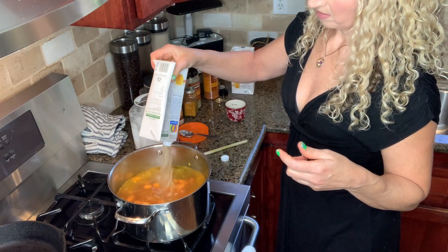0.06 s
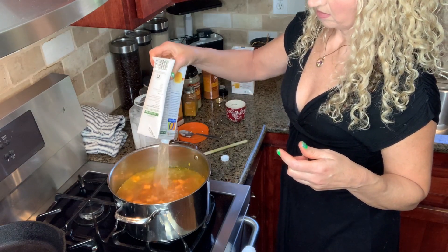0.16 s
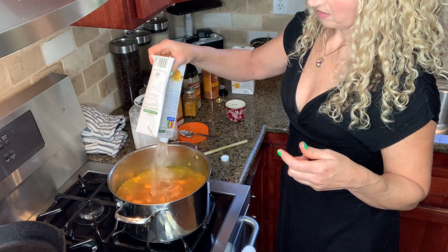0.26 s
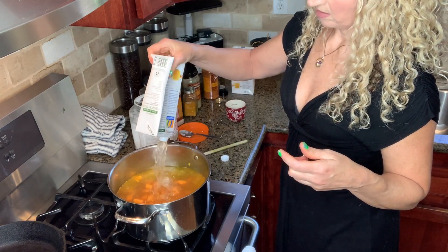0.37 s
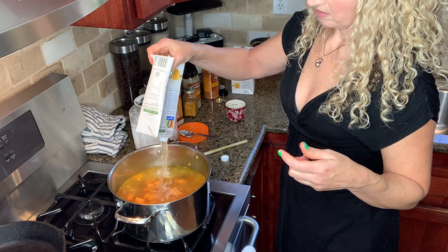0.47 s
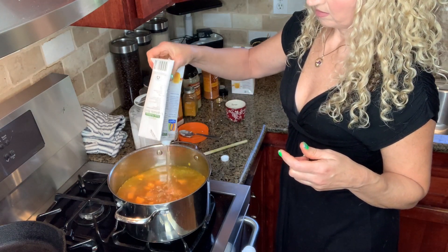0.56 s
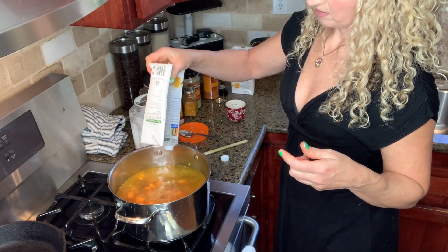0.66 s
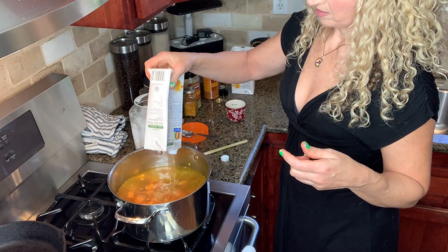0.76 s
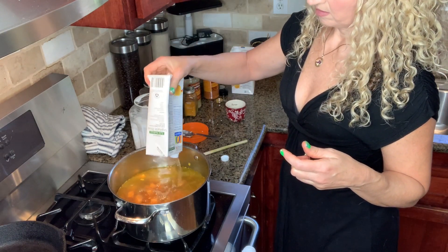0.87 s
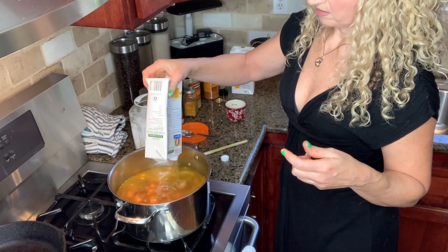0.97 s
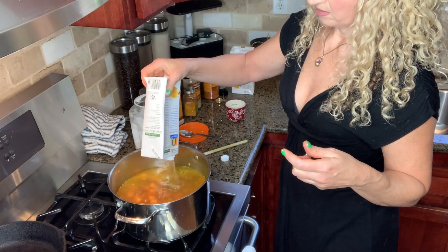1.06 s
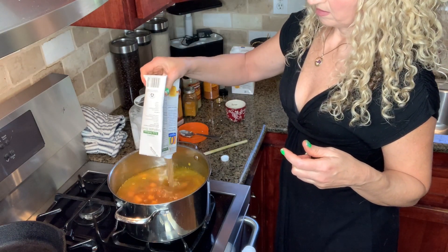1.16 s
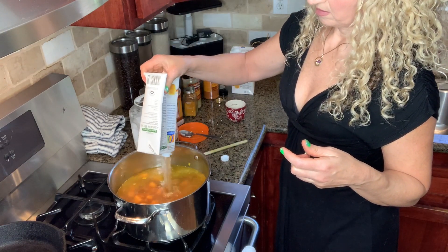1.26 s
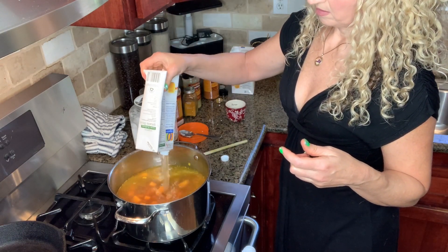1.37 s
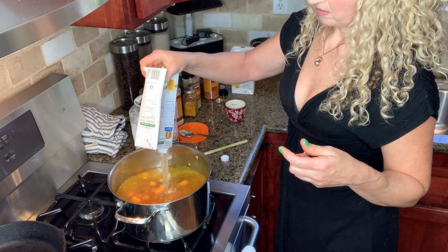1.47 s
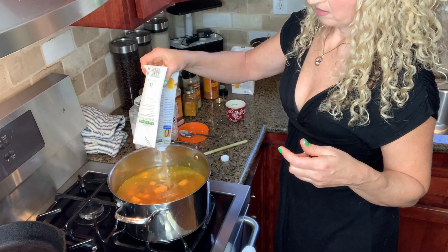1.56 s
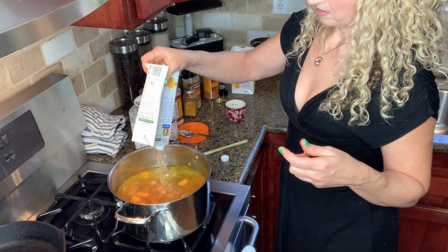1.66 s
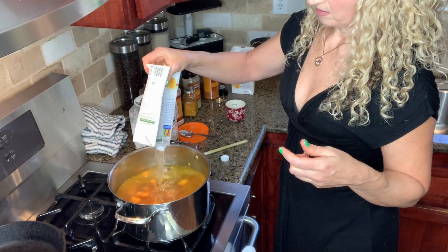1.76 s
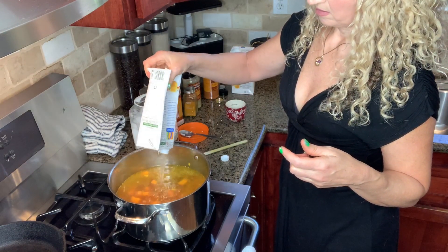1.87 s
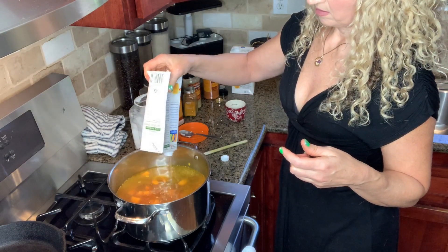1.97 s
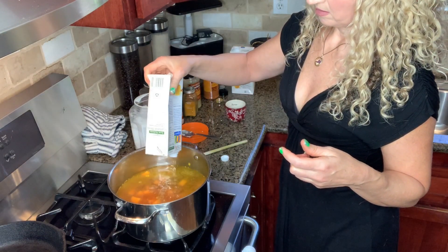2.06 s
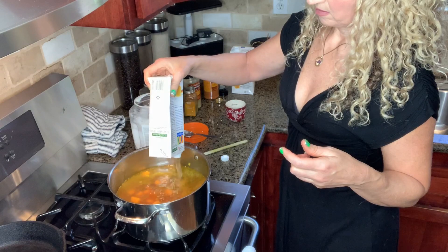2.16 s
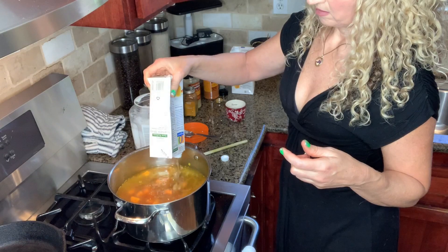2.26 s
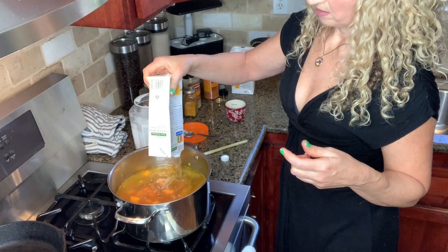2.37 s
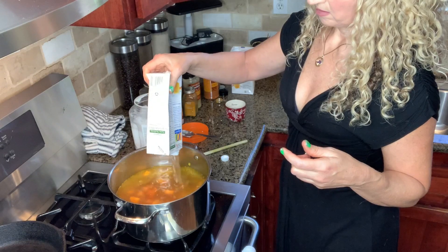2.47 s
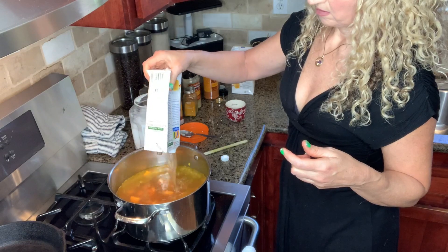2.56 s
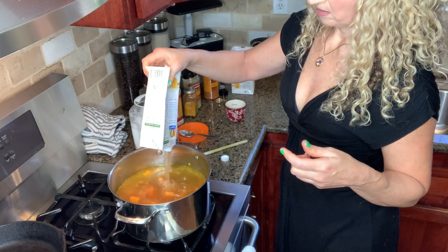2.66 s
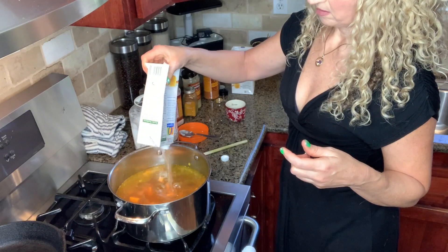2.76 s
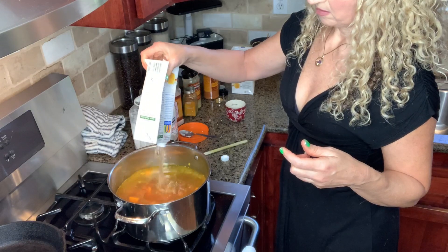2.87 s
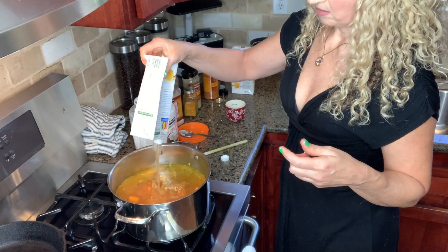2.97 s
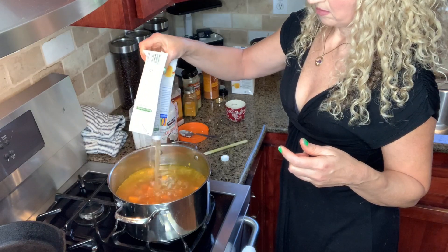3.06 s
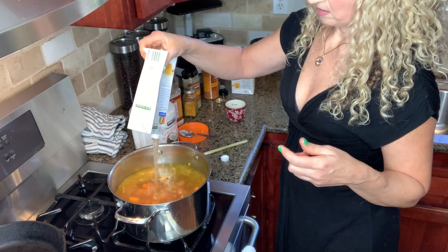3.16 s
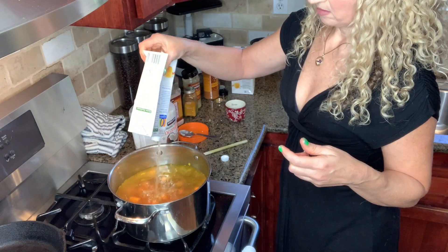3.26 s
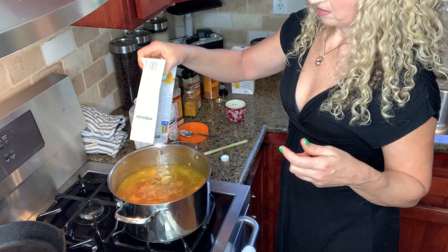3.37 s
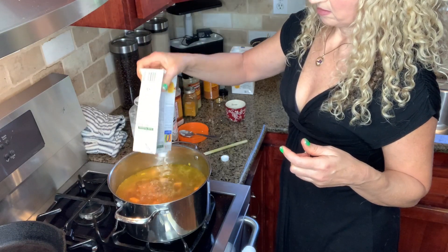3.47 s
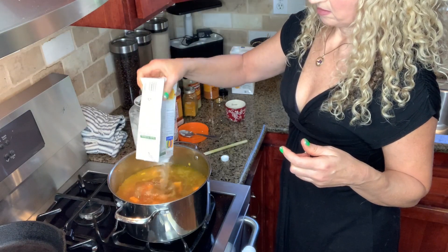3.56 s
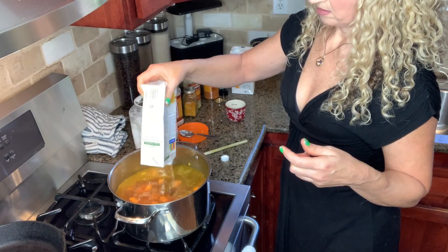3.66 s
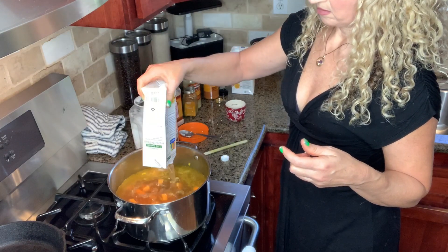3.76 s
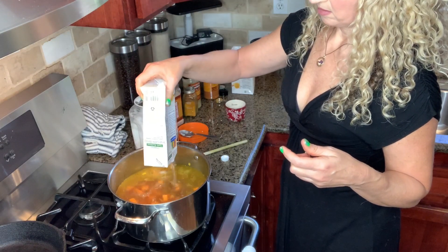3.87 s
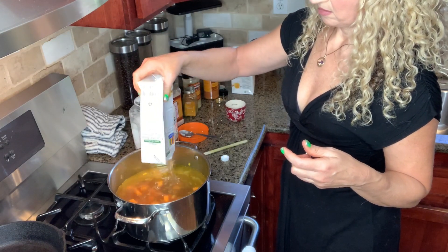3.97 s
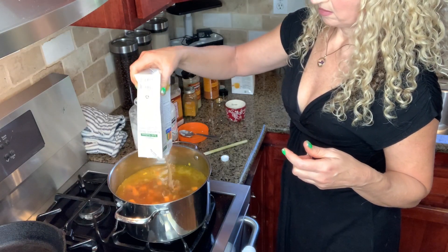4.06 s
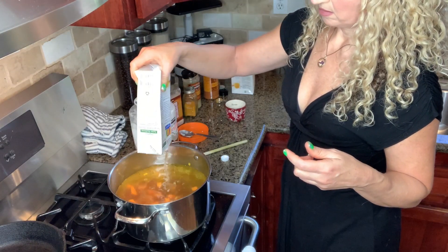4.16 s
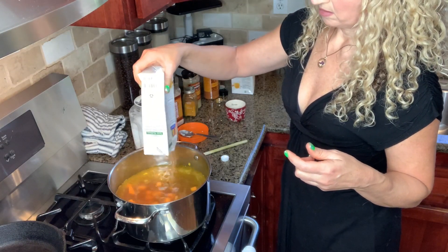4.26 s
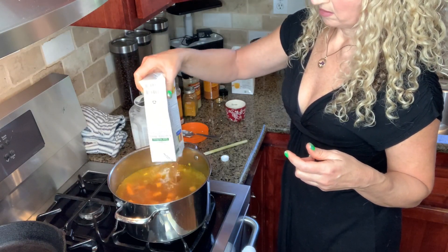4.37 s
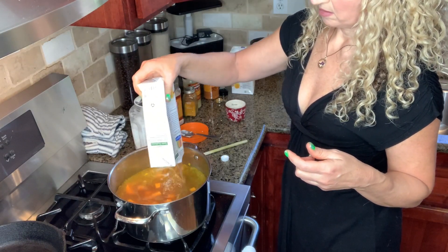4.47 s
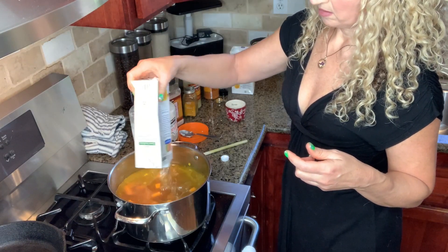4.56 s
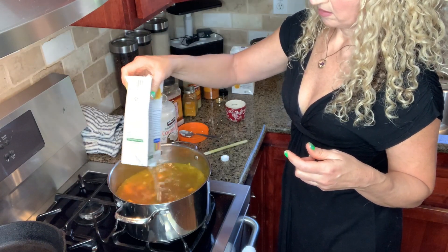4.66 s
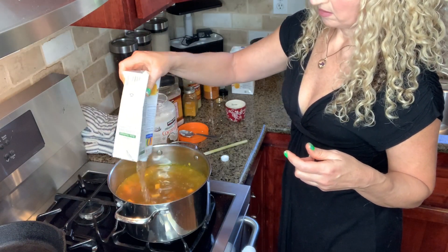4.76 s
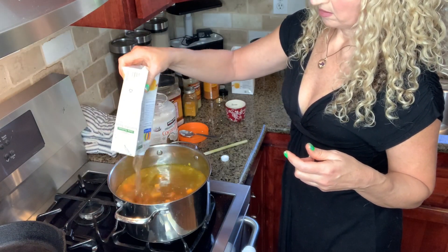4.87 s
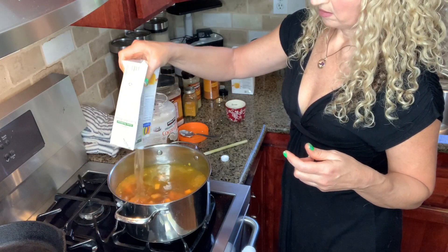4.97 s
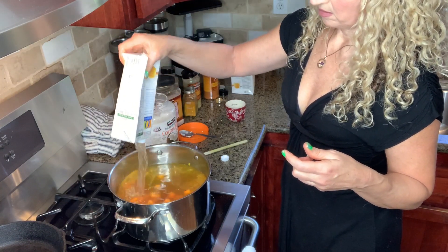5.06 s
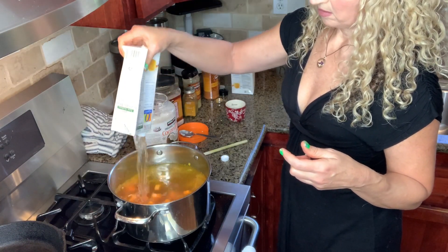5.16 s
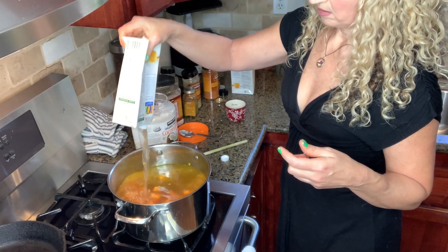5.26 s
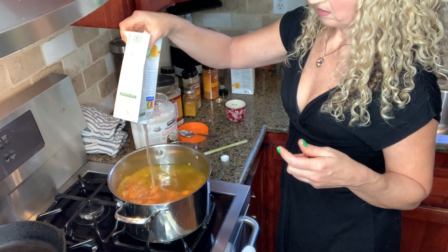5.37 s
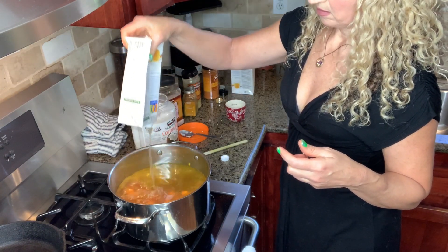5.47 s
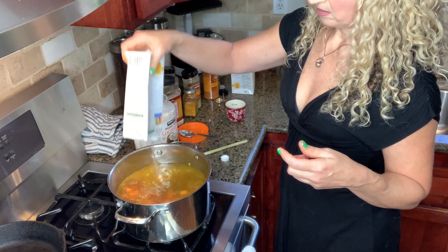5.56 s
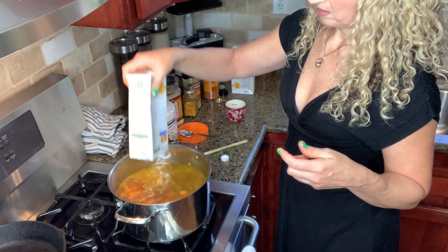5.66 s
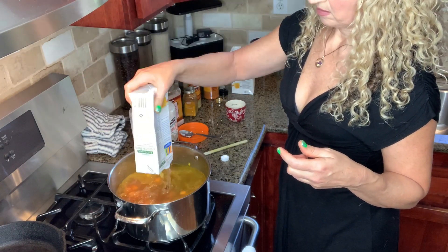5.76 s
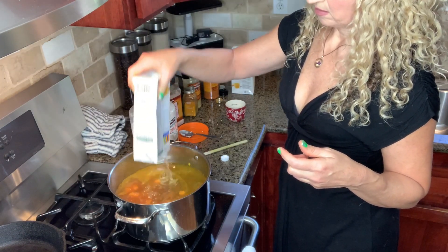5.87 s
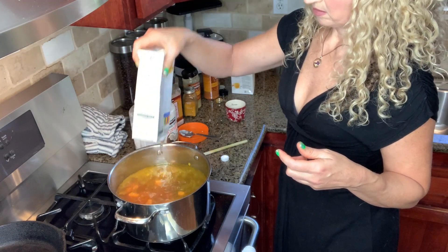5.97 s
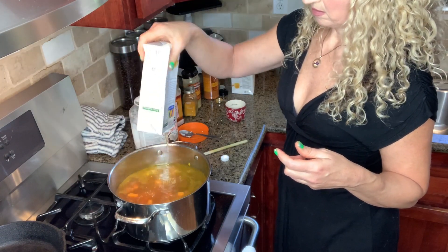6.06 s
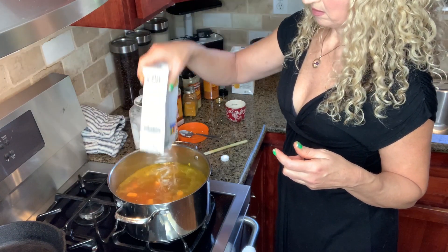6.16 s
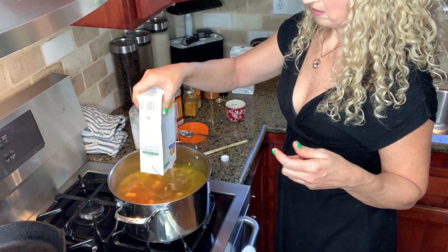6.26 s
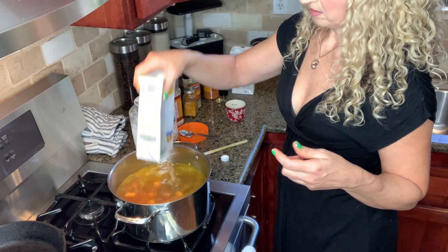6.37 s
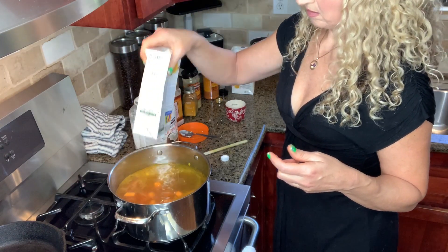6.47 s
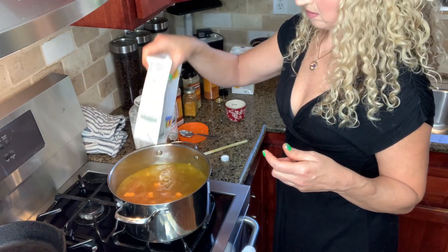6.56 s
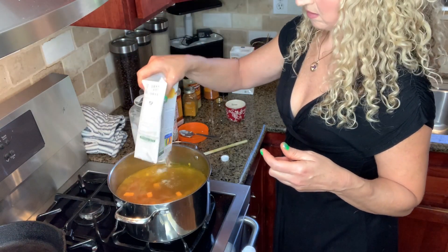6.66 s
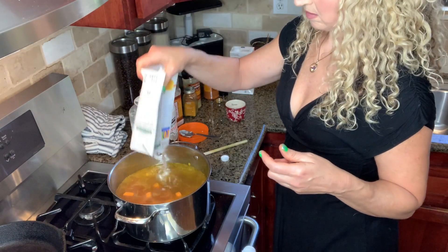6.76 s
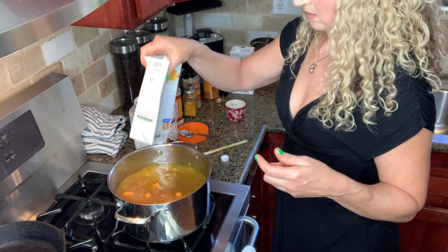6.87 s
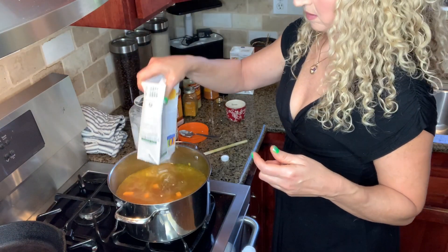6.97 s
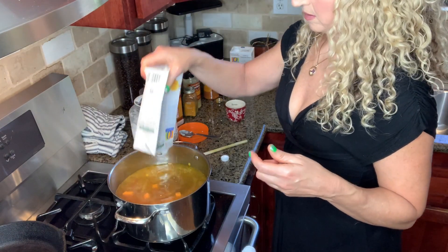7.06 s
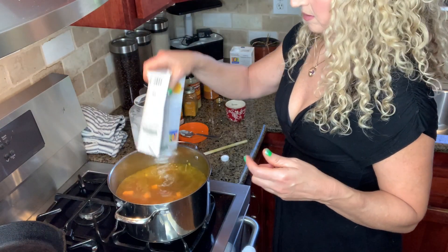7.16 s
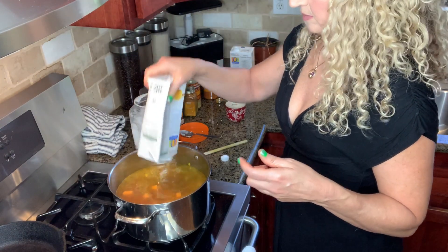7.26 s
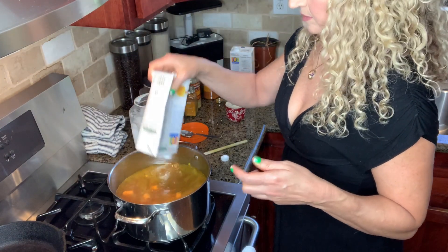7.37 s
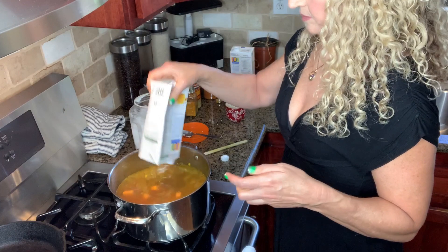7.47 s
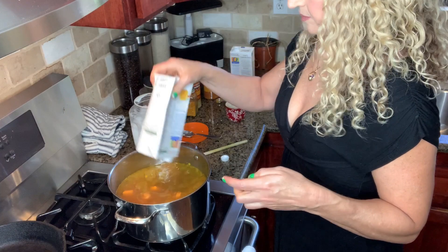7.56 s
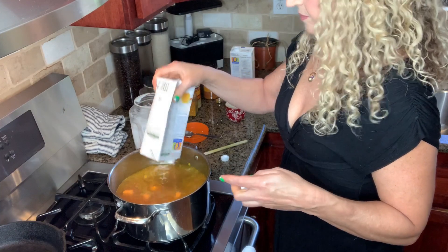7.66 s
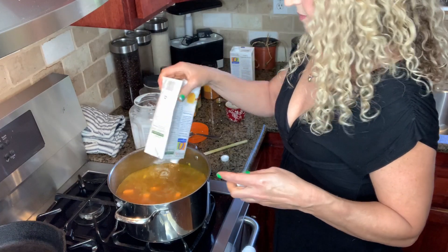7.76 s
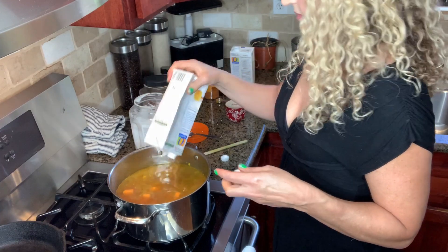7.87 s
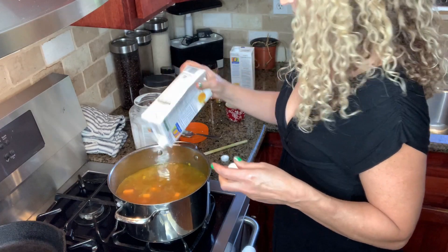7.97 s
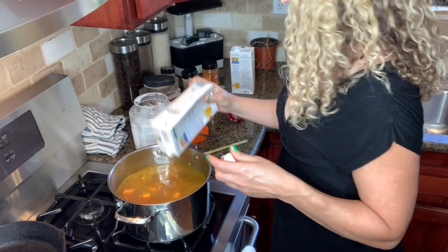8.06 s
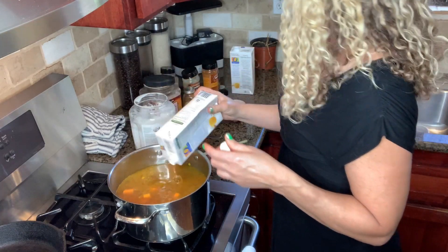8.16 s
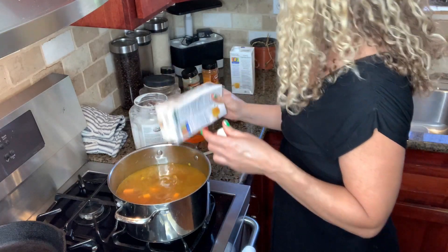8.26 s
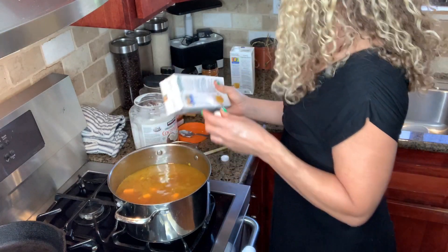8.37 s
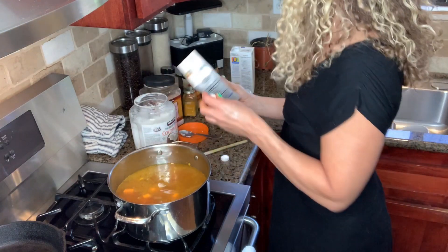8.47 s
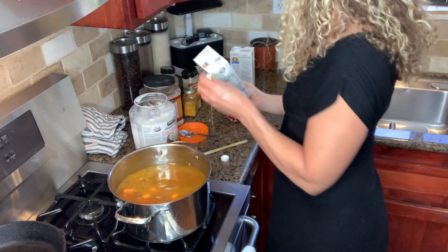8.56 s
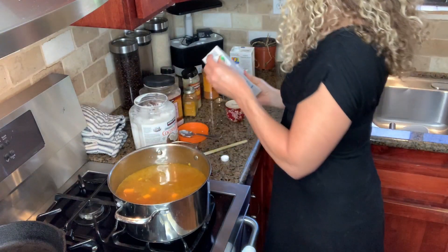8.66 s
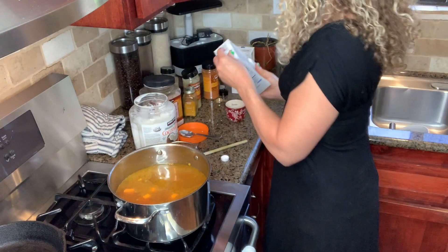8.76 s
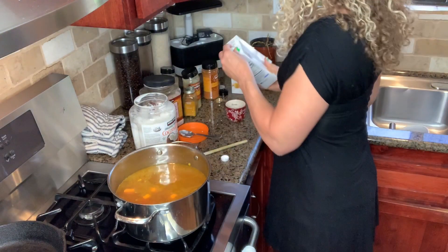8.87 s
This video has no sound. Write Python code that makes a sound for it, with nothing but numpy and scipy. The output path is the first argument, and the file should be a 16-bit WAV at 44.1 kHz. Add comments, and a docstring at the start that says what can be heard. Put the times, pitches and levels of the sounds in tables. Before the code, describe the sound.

A broken stream of liquid gurgles and spatters into a pot in a small kitchen, dwindles away, followed by a sharp knock and faint closing hiss.

```python
"""Pouring broth into a pot

Broth pours from a carton into a steel pot of soup: a broken stream of plops, bubbles and spray, thinning to
drips. Splashes are bubble tones plus noise, colored by the pot's resonances; gulped air thumps the carton.
Then one hard knock rings the counter, and a broad hiss swells at the close. A small hard kitchen echoes under
a low appliance drone; two close microphone ports hear the treble out of step."""
import sys
import numpy as np
from scipy import signal
from scipy.fft import rfft, irfft, next_fast_len
from scipy.io import wavfile
from scipy.ndimage import map_coordinates

SR = 44100
rng = np.random.default_rng(int(sys.argv[2]) if len(sys.argv) > 2 else 0)


def store_pcm(level_fs):
    """Save levels as 16-bit WAV."""
    pcm = np.round(np.clip(level_fs, -1, 1) * 32767).astype(np.int16)
    wavfile.write(sys.argv[1], SR, np.atleast_2d(pcm).T)


N = 393813   # length in samples

# How the stream surges and slackens as the carton is tipped and shaken: start_s, flow_db (level of the spray)
STREAM_FLOW = [(0.0, -46), (0.2, -46.5), (0.77, -62.5), (1.15, -63.5), (1.35, -55.5), (2.0, -55),
               (2.5, -58), (2.76, -49), (2.99, -47), (3.2, -54.5), (3.8, -63), (4.05, -67.5), (4.55, -66.5),
               (4.95, -48), (5.73, -60), (6.08, -78.5), (6.33, -55.5), (6.46, -86.5), (6.72, -89),
               (6.93, -69.5), (7.14, -87), (7.45, -100)]
# The loudest plops and splashes: start_s, level_db, pitch_hz, splat_db (strength of the noisy part)
PLOPS = [(0.817, -40, 1197, -31), (0.529, -29, 2078, -41), (0.671, -36, 4330, 1), (0.692, -36.5, 1306, 3),
         (0.737, -35, 537, 3), (0.89, -34.5, 5730, -31), (0.941, -32, 2750, -13),
         (0.961, -19.5, 4230, -17.5), (1.138, -45.5, 3054, 2.5), (1.236, -33, 2017, -13),
         (1.27, -30.5, 2196, -6.5), (1.308, -40.5, 3620, 6), (1.487, -34, 630, -8), (1.56, -53, 4150, 13.5),
         (1.795, -37.5, 2010, 0), (1.867, -35, 1815, -27), (2.074, -30, 612, -38),
         (2.22, -28.5, 1300, -15.5), (2.435, -47, 2076, 6.5), (2.585, -40, 2700, 0),
         (2.636, -33.5, 496, -2.5), (2.917, -33, 3430, -6.5), (3.003, -40, 602, 1.5),
         (3.392, -41.5, 499, 2.5), (3.8, -36, 2746, -19), (3.74, -38, 1207, -29),
         (3.875, -41.5, 1085, -4.5), (4.069, -41.5, 3850, -11), (4.107, -33.5, 910, -4.5),
         (4.232, -41, 3190, -12), (4.297, -31, 1173, -9), (4.396, -26, 648, -7), (4.604, -33, 2520, -20),
         (4.657, -36.5, 2280, -40), (4.735, -34, 1150, -22), (4.811, -34.5, 1080, -24),
         (5.064, -33, 742, -25), (5.336, -35, 496, -1), (5.506, -35.5, 776, -11), (5.575, -34.5, 850, -16),
         (5.613, -36, 2047, -2.5), (5.67, -34.5, 2690, -3), (5.746, -37, 1584, -9), (5.852, -33, 595, -3),
         (5.874, -44, 4700, -19), (5.93, -41, 2730, -0.5), (5.994, -44, 2760, -2.5),
         (6.031, -35, 1190, -32), (6.139, -46, 5330, -0.5), (6.192, -37.5, 6800, -13),
         (6.219, -29.5, 4040, -31), (6.242, -38.5, 1246, -28), (6.283, -45, 1770, -15),
         (6.322, -42, 854, -22), (6.783, -37.5, 1030, -11), (6.835, -50.5, 2360, -5),
         (6.885, -48.5, 2150, -6), (6.906, -36, 6980, -19), (6.958, -40.5, 3460, -12),
         (7.068, -45.5, 3470, -9), (7.303, -64.5, 3440, -17)]
# Single clear bubbles: start_s, level_db, start_pitch_hz, end_pitch_hz, decay_s
BUBBLES = [(3.69, -32, 987, 600, 0.0083), (4.109, -34.5, 1250, 590, 0.0075),
           (6.005, -46, 713, 1250, 0.0155), (7.086, -50, 1500, 1440, 0.018)]
# Air gulped by the carton: start_s, level_db, pitch_hz, murmur_t60_s (time to fall 60 dB)
GLUGS = [(0.656, -37.5, 140, 0.31), (1.973, -40.5, 162, 0.076), (5.153, -36, 291, 0.17),
         (5.203, -38, 295, 0.82), (5.358, -40, 288, 0.23)]
# Resonances of the air in the pot: pitch_hz, width_hz, level_db
POT_MODES = [(491, 24, 4), (609, 40, 0), (831, 205, -4.5), (1181, 90, -1.5), (2054, 38, 6), (2733, 46, 7),
             (3366, 57, 2.5), (3940, 560, -6)]
# Color of spray and splats: frequency_hz, level_db (per Hz)
SPRAY_COLOR = [(500, -6.5), (1650, -11.5), (2500, -10), (6000, -2), (9000, -2.5), (16000, -15)]
# The knock and its bounces: start_s, level_db
KNOCK_BLOWS = [(8.14, -8), (8.16, -30), (8.197, -36)]
# What the knock rings in the counter: pitch_hz, level_db, t60_s
COUNTER_MODES = [(63.4, -26.5, 0.77), (96, -21, 0.279), (121, -24.5, 0.59), (151.2, -25, 0.3),
                 (358, -3.5, 0.022), (540, 2.5, 0.025), (892, 2, 0.019), (1199, 3.5, 0.019),
                 (2110, -16.5, 0.016), (2406, -18, 0.027), (3890, -13, 0.0124)]
# The broad hiss that swells at the close: start_s, level_db
LAST_HISS = [(8.78, -94), (8.856, -59.5), (8.93, -52.5)]
# How long the kitchen's echoes last: frequency_hz, t60_s
KITCHEN_T60 = [(100, 0.28), (1000, 0.34), (5000, 0.34), (16000, 0.0802)]
# Color of the appliance rumble: frequency_hz, level_db (per Hz, before the overall level is set)
DRONE_COLOR = [(24, -23), (40, -10), (65, -6.5), (130, -17), (240, -6.5), (264, -13), (340, -10.5),
               (453, -18), (4000, -52.5), (5200, -81.5)]
# Likeness of the rumble at left and right: frequency_hz, likeness (0 to 1)
DRONE_ALIKE = [(60, 0.82), (400, 0.66), (3000, 0.14)]
# Wavering hum lines: pitch_hz, rms_level_db, width_hz
HUM_LINES = [(58.5, -66, 3.1), (239.6, -63.5, 1.7)]
# How far the left port is ahead: frequency_hz, lead_radians
PORT_LEAD = [(0, 0), (780, 1.3), (1210, -0.2), (1550, 0.3), (3700, -0.3), (6120, 0.6), (7920, 2.8),
             (9560, 3.2), (13200, 6.2), (16500, 6.7)]
# How much louder the left port is than the right: frequency_hz, difference_db
PORT_LEAN = [(150, 4.5), (270, -2), (550, 2), (1000, 0)]

REFERENCE_FLOW_DB = -50.5   # at this flow, gurgle and fizz have the levels below
GURGLE_DB, GURGLE_FOLLOWS = -54.5, 0.93   # level, and its share of the flow's swing in dB
FIZZ_DB, FIZZ_FOLLOWS, FIZZ_PER_S = -51.5, 0.44, 83   # the same, and bursts per second
GURGLE_ENDS_S = 6.0   # the carton is nearly empty, so the gurgle has faded out
LUMPS_HZ = 16   # how fast the lumps in the stream come and go
KITCHEN_DB, KNOCK_TO_ECHO_DB = -17, -1
DRONE_DB, STILL_AIR_DB = -58.5, -84
STOP_HZ = 16640   # from here up the microphone is at least 70 dB down


def stream():
    """Large bubbles gurgle, droplets patter on hiss, foam fizzes; all follow the flow, lumpier when thin."""
    flow_db, = in_time(STREAM_FLOW)
    slack_db = flow_db - REFERENCE_FLOW_DB
    flowing = np.arange(N) < STREAM_FLOW[-1][0] * SR
    lumps = drift(LUMPS_HZ) * np.clip(.4 - slack_db / 10, .3, 1.2)

    gurgle = swarm(count=1600, low_hz=451.7, high_hz=1298, uneven_db=3.5, splat_db=-31.0,
                   rise=0.08, size=1000, lump_db=4.15 * lumps)
    gurgle = gurgle * np.clip((GURGLE_ENDS_S - np.arange(N) / SR) / 0.29, 0, 1)   # fades over 0.29 s
    patter = swarm(count=4800, low_hz=1512, high_hz=7917, uneven_db=3.0, splat_db=-19.5,
                   rise=0.012, size=400, lump_db=2.84 * lumps)
    spray = patter + from_db(-3.5) * wash()

    gurgle_level = from_db(GURGLE_DB + GURGLE_FOLLOWS * slack_db)
    fizz_level = from_db(FIZZ_DB + FIZZ_FOLLOWS * slack_db)
    return flowing * (gurgle_level * gurgle + from_db(flow_db) * spray + fizz_level * fizz())


def swarm(count, low_hz, high_hz, uneven_db, splat_db, rise, size, lump_db):
    """Small splashes at random moments, pitches and sizes, bigger within a lump; rms 1."""
    when, pitch, luck, climb = rng.random((count, 4)).T
    s = when * STREAM_FLOW[-1][0]
    size_db = uneven_db * np.minimum(-np.log(1 - luck), 3) + lump_db[(s * SR).astype(int)]
    hz = low_hz * (high_hz / low_hz) ** pitch
    return rms_one(splashes(s, size_db, hz, np.full(count, splat_db), rise * climb, size))


def splashes(s, level_db, hz, splat_db, rise, size):
    """Each splash: a bubble rising in pitch as it nears the surface, froth about that pitch, a broad splat."""
    t, hz = np.arange(size) / SR, hz[:, None]
    noise = rng.standard_normal((len(s), 2, size))
    life = 0.008 + 2.0 / hz   # small, high bubbles die sooner
    bubble = np.sin(2 * np.pi * hz * t * (.97 + rise[:, None] * t / life)) * np.exp(-t / life)

    steps = np.minimum(t * hz * .45, size - 2)   # froth wobbles at a share of the pitch
    rows = np.broadcast_to(np.arange(len(s))[:, None], steps.shape)
    wobble = map_coordinates(noise[:, 0], [rows, steps], order=1)
    froth = wobble * np.cos(2 * np.pi * hz * t) * np.exp(-t / 0.017)

    bright = noise[:, 1]
    dull = signal.sosfilt(signal.butter(2, 7500, fs=SR, output="sos"), bright)
    splat = bright * (1.52 * np.exp(-t / 0.0012) + 1.5 * np.exp(-t / 0.018))
    splat = splat + 0.93 * dull * np.exp(-t / 0.042)   # the longest part has less treble
    splat = from_db(splat_db)[:, None] * splat

    tonal = from_db(-7.0) * (bubble + froth)
    grains = np.stack([tonal, splat], axis=1) * from_db(level_db)[:, None, None]
    grains *= (1 - np.exp(-t / 0.0009)) * np.cos(np.pi / 2 * t / t[-1])   # soft start, silent end
    out = np.zeros((2, N + size))
    for at, grain in zip(np.round(s * SR).astype(int), grains):
        out[:, at:at + size] += grain
    return out[0, :N] + shaped(out[1, :N], spray_color)


def spray_color(hz):
    """Gain of the spray's color at each frequency."""
    return from_db(at_hz(SPRAY_COLOR, hz))


def wash():
    """Spray noise whose bands swell and sag, partly together and partly each in its own time; rms 1."""
    noise = shaped(rng.standard_normal(N), spray_color)
    edges, together = np.geomspace(700, 17000, num=6), drift(14)
    out = np.zeros(N)
    for pair in zip(edges, edges[1:]):
        band = signal.sosfilt(signal.butter(2, pair, "band", fs=SR, output="sos"), noise)
        out += band * from_db(2.5 * together + 3.0 * drift(26))
    return rms_one(out)


def fizz():
    """The finest bubbles burst in the foam: short treble ticks over a steady fine hiss; rms 1."""
    burst_sizes = from_db(5 * np.minimum(rng.exponential(1, N), 3.5))
    bursts = (rng.random(N) < FIZZ_PER_S / SR) * burst_sizes
    fade = np.exp(-1 / (0.0045 * SR))   # each burst dies in a few milliseconds
    hiss = (signal.lfilter([1], [1, -fade], bursts) + 0.4) * rng.standard_normal(N)
    return rms_one(signal.sosfilt(signal.butter(4, 7500, "high", fs=SR, output="sos"), hiss))


def plops():
    """The distinct splashes: the same bubble, froth and splat, each placed from the table."""
    s, level_db, hz, splat_db = np.transpose(PLOPS)
    return splashes(s, level_db, hz, splat_db, np.full(len(s), .04), size=2600)


def bubbles():
    """Fluttering tones that glide as the bubble's hollow opens or closes."""
    out, flutter = np.zeros(N), from_db(4 * drift(60))
    for s, level_db, start_hz, end_hz, life in BUBBLES:
        t = np.arange(round(4 * life * SR)) / SR
        hz = end_hz + (start_hz - end_hz) * np.exp(-t / life)
        tone = np.sin(2 * np.pi * np.cumsum(hz) / SR) * (1 - np.exp(-t / 0.0023)) * np.exp(-t / life)
        out[round(s * SR):][:len(t)] += from_db(level_db) * tone
    return out * flutter


def pot(x):
    """The air over the soup rings between steel walls, each mode coming and going as the surface sloshes."""
    out = from_db(-1.5) * x
    for hz, width, db in POT_MODES:
        out = out + resonance(from_db(db + 3.54 * drift(8.7)) * x, hz, width)
    return out


def glugs():
    """Air breaking into the carton thumps its hollow, then the slosh keeps it murmuring."""
    out, t = np.zeros(N), np.arange(N) / SR
    for s, level_db, hz, t60 in GLUGS:
        span = slice(round(s * SR), round(s * SR) + SR // 2)
        push = 0.052 * rng.standard_normal(SR // 2) * from_db(-60 * (t[span] - s) / t60)
        push[0] = 1   # the thump
        out[span] += from_db(level_db) * ring(push, hz, 0.06)
    return signal.sosfilt(signal.butter(2, 500, fs=SR, output="sos"), out)


def knock():
    """A blow and its softer bounces ring the counter's modes, kept rough by a rattle, with a crack on top."""
    s, db = np.transpose(KNOCK_BLOWS)
    at, out = np.round(s * SR).astype(int), np.zeros(N)
    t = np.maximum(np.arange(N) / SR - s[0], 0)   # time since the first blow
    rattle = from_db(-54) * rng.standard_normal(N) * (t > 0) * np.exp(-t / 0.059)
    for hz, mode_db, t60 in COUNTER_MODES:
        blows = from_db(mode_db) * rattle
        blows[at] = from_db(db + mode_db + rng.normal(0, 0.49, len(at)))
        out += ring(blows, hz, t60) * (1 - np.exp(-t * hz / 3.3))   # a mode takes a few cycles to get going
    out = signal.sosfilt(signal.butter(2, 2600, fs=SR, output="sos"), out)   # the contacts are blunt

    grit = resonance(resonance(rng.standard_normal(N), 1900, 1400), 1700, 5200)
    grit = grit + from_db(-23.5) * rng.standard_normal(N)
    crack_shape = (1 - np.exp(-t / 0.0016)) * (np.exp(-t / 0.0095) + 0.074 * np.exp(-t / 0.066))
    return out + from_db(-21.0) * grit * crack_shape


def last_hiss():
    """Smooth broad noise that rises in the last moment."""
    level = from_db(in_time(LAST_HISS)[0]) * (np.arange(N) > LAST_HISS[0][0] * SR)
    noise = shaped(rng.standard_normal(N), lambda hz: spray_color(hz) / (1 + hz / 9000))
    return level * rms_one(noise)


def kitchen(x):
    """Feedback echoes between hard walls, with a fade time for each pitch; both ports hear the bass echoes
    alike, but higher up the echoes mostly differ between them."""
    lags = rng.uniform(0.014, 0.044, (2, 9))   # seconds per lap, nine loops for each of two echo sets

    def walls(hz):
        """Sum of the echo loops at each frequency."""
        t60, out = at_hz(KITCHEN_T60, hz), np.zeros((2, len(hz)), complex)
        for k in range(9):
            lag = lags[:, k, None]
            lap = from_db(-60 * lag / t60) * np.exp(-2j * np.pi * hz * lag)
            out += (-1) ** k * lap / (1 - lap)
        return out

    shared, apart = shaped(x, walls)
    apart = signal.sosfilt(signal.butter(2, 250, "high", fs=SR, output="sos"), apart)   # bass is alike at both
    return shared + from_db(3.0) * apart * np.array([[1], [-1]])


def drone():
    """Appliance rumble partly alike at both ports, plus narrow noise bands as a shared wavering hum."""
    def alike(hz):
        """Left-right likeness at each frequency."""
        return np.clip(at_hz(DRONE_ALIKE, hz), 0, .99)

    mid, side = rng.standard_normal((2, N))
    mid = shaped(mid, lambda hz: from_db(at_hz(DRONE_COLOR, hz)) * np.sqrt(1 + alike(hz)))
    side = shaped(side, lambda hz: from_db(at_hz(DRONE_COLOR, hz)) * np.sqrt(1 - alike(hz)))
    rumble = from_db(DRONE_DB) * rms_one(mid + side * np.array([[1], [-1]]))
    hum = np.zeros(N)
    for hz, db, width in HUM_LINES:
        hum += from_db(db) * rms_one(resonance(rng.standard_normal(N), hz, width))
    return rumble + hum


def ports(x):
    """The two ports differ in level and timing at each pitch; each takes half of the difference."""
    def half(hz):
        """The left port's half, as gain and phase."""
        return from_db(at_hz(PORT_LEAN, hz) / 2) * np.exp(.5j * np.interp(hz, *np.transpose(PORT_LEAD)))

    return shaped(x, lambda hz: np.array([half(hz), 1 / half(hz)]))


def from_db(db):
    """Turn decibels into a gain."""
    return 10 ** (np.asarray(db) / 20)


def rms_one(x):
    """Scale to an average strength (rms) of 1."""
    return x / np.sqrt(np.mean(x ** 2) + 1e-20)


def in_time(rows):
    """Read the columns of a timed table at every sample."""
    s, *columns = np.transpose(rows)
    return [np.interp(np.arange(N) / SR, s, c) for c in columns]


def at_hz(points, hz):
    """Read a frequency table on a log-frequency axis."""
    p = np.array(points, float)
    return np.interp(np.log(hz + 1), np.log(p[:, 0] + 1), p[:, 1])


def shaped(x, response):
    """Filter by a response given as a function of frequency."""
    size = next_fast_len(N + SR // 2)
    hz = np.arange(size // 2 + 1) * SR / size
    return irfft(rfft(x, size) * response(hz), size)[..., :N]


def drift(rate):
    """Slow random wander of rms 1; a higher rate in Hz wanders faster."""
    r = np.exp(-80 * np.pi * rate / SR)   # made at one point per 40 samples
    slow = signal.lfilter([1], [1, -2 * r, r * r], rng.standard_normal(N // 40 + 2002))[2000:]
    return np.interp(np.arange(N) / 40, np.arange(len(slow)), rms_one(slow))


def ring(clicks, hz, t60):
    """A unit click sets a dying sine of starting height 1 ringing."""
    r, w = from_db(-60 / (t60 * SR)), 2 * np.pi * hz / SR
    return signal.lfilter([0, np.sin(w)], [1, -2 * r * np.cos(w), r * r], clicks + 1e-18)


def resonance(x, hz, width):
    """Let through a band around one pitch, with gain about 1 at its center."""
    r = np.exp(-np.pi * width / SR)
    top = np.array([1, 0, -1]) * (1 - r * r) / 2
    return signal.lfilter(top, [1, -2 * r * np.cos(2 * np.pi * hz / SR), r * r], x)


def scene():
    """The pot, carton, knock and hiss near the ports, their echo, the drone and a faint steady hiss."""
    near = pot(stream() + plops() + bubbles()) + glugs() + last_hiss()
    blow = knock()
    echo = from_db(KITCHEN_DB) * kitchen(near + from_db(KNOCK_TO_ECHO_DB) * blow)
    still_air = from_db(STILL_AIR_DB) * rng.standard_normal(N)
    return ports(near + blow + echo + drone() + still_air)


def record(dry):
    """The microphone drops the deepest bass; the top is cut steeply."""
    dry = signal.sosfilt(signal.butter(4, 45, "high", fs=SR, output="sos"), dry)
    return signal.sosfilt(signal.cheby2(14, 70, STOP_HZ, fs=SR, output="sos"), dry)


dry = scene()
out = record(dry)
store_pcm(out)
```